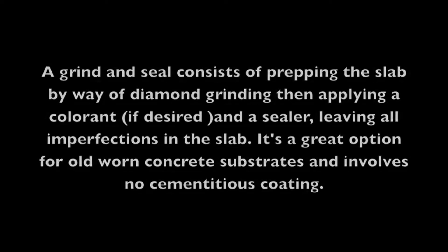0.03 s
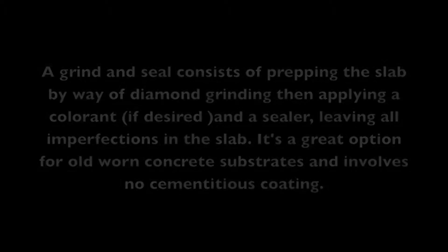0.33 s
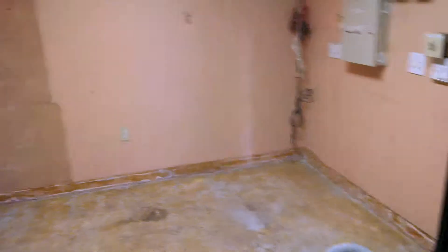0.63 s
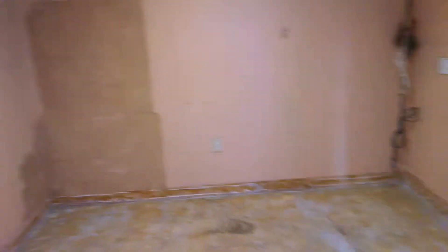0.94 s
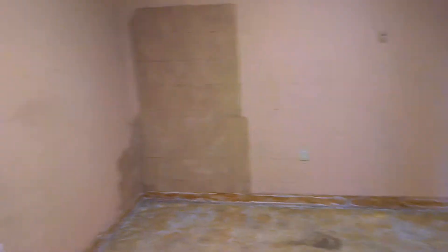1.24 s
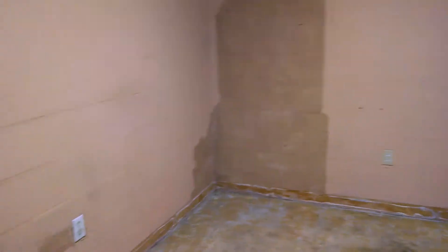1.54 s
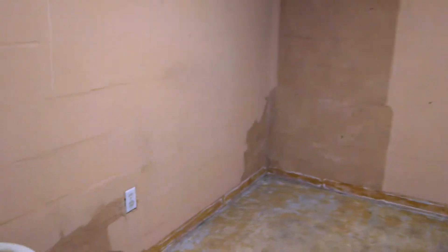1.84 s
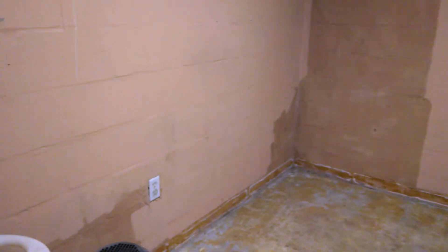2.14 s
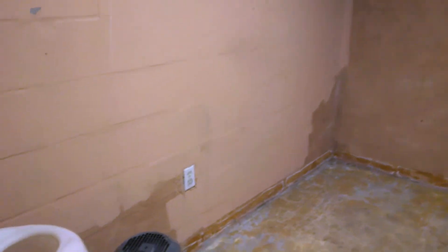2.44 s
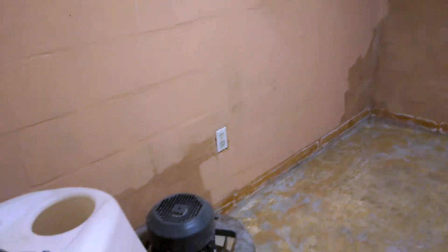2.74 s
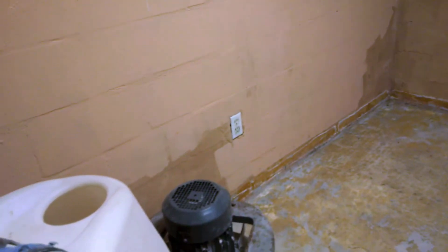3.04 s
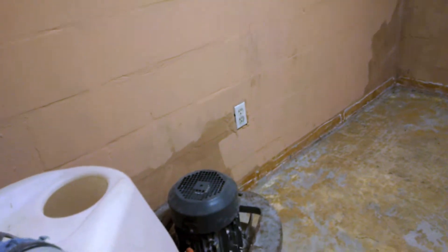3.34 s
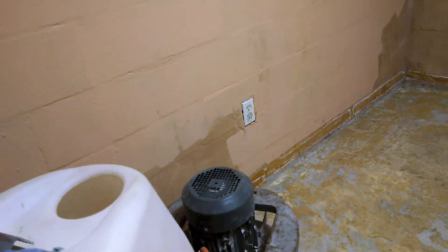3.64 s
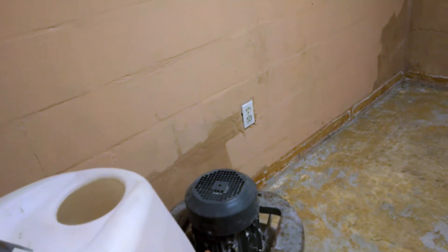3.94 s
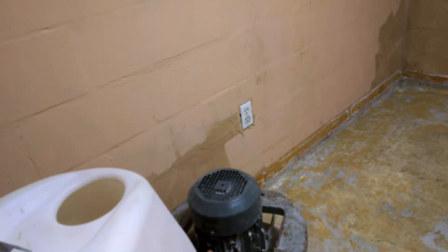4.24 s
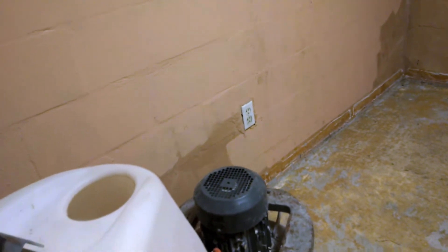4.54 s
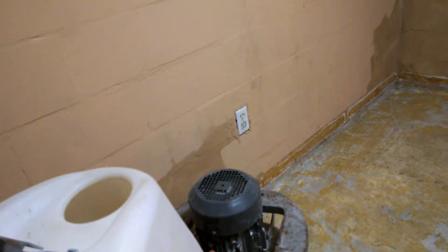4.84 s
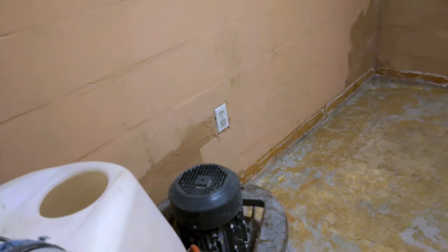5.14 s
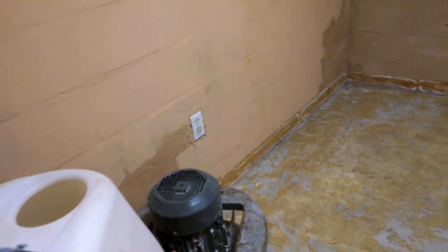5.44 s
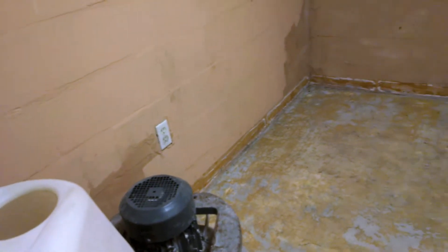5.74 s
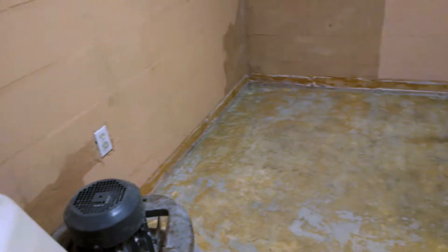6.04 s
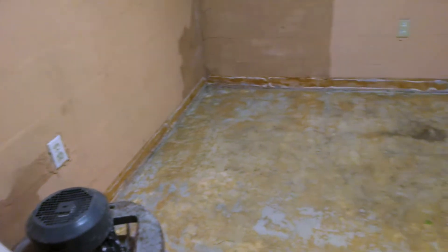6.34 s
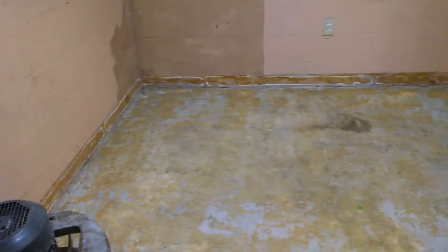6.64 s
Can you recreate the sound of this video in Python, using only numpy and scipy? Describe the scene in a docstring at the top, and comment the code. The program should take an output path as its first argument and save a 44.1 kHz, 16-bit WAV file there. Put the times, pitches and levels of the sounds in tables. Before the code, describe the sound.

A machine grinds a concrete floor steadily, hissing, rumbling and chattering, with one hard bump on the microphone early on.

```python
"""A hand-held camera cuts in at 0.7 s on a diamond floor grinder working concrete in a bare block room.
The frame rumbles, the motor hums and faintly whines, the steel disc rings, the head chatters, the
diamonds scratch out a dense hiss. The hiss swells once a turn, the chatter twice. From 1.2 s, now and
then, the diamonds rasp over a high spot or the head catches and growls. Bumps hit the camera at 1.7 and
2 s; the second, harder one ducks its gain, which creeps back for a second as it turns to the machine."""
import sys
import numpy as np
from scipy import signal
from scipy.fft import rfft, irfft, next_fast_len
from scipy.io import wavfile
from scipy.ndimage import uniform_filter1d, map_coordinates

SR = 44100
rng = np.random.default_rng(int(sys.argv[2]) if len(sys.argv) > 2 else 0)


def dump(signal):
    """Clip the signal to [-1, 1] and save it as 16-bit WAV at the path in sys.argv[1]."""
    limited = np.clip(np.atleast_2d(signal).T, -1, 1)
    pcm = np.round(limited * 32767).astype(np.int16)
    wavfile.write(sys.argv[1], SR, pcm)


N = 303849
TIME_S = np.arange(N) / SR
START_S, PORT_DELAY_S = 0.7125, 0.000392
TURN_HZ, HIGH_SIDE_S = 2.305, 3.83  # head rotation; one pass over the slab's high side

# stereo width at the microphone ports: (frequency [Hz], side over mid [dB])
SIDE_DB = [(50, -14), (150, -6.5), (400, -7), (800, -6.5), (1300, -0.5), (2000, 2.5), (3000, -0.5),
           (15000, 2)]
# share of the other port subtracted: (frequency [Hz], into left [ratio], into right [ratio])
CROSSFEED = [(300, 0.026, 0.016), (1200, 0.65, 0.71), (2330, 0.63, 0.67), (3780, 0.61, 0.49),
             (6200, .1, 0.37), (8940, 0.05, 0.28), (11700, 0.96, 1)]
# mains and motor tones: (frequency [Hz], level [dB], phase between ports [rad])
HUM_TONES = [(59.6, -55.5, .2), (115.4, -40, 1.5), (235.5, -39.5, 1.1)]
# hum drift: (time [s], gain [dB])
HUM_DRIFT_DB = [(0.71, 0), (1.9, 0.5), (2.4, -1.5), (3.8, -2), (5.3, -0.5), (6, 1.5), (6.88, .5)]
# motor whine: (frequency [Hz], width [Hz], relative level [dB])
WHINE_PEAKS = [(7885, 4, 0), (7961, 4, -8), (8039, 4, -8), (8115, 4, -2)]
# frame shake: (time [s], level [dB])
RUMBLE_DB = [(0.71, -29), (1.05, -30), (1.17, -22), (1.4, -27), (1.85, -23.5), (2.4, -26.2), (2.7, -24),
             (2.95, -26.3), (3.8, -28), (4.0, -26), (5.3, -26.5), (6.88, -28.8)]
# frame rumble: (frequency [Hz], relative density [dB])
RUMBLE_SPECTRUM = [(20, -25), (40, -19), (50, -11.5), (75, -29), (90, -24), (105, -12), (125, -12),
                   (145, -5.5), (220, -3), (250, -3.5), (290, 2), (400, -6.5), (700, -43)]
# room modes, camera facing the far corner: (frequency [Hz], width [Hz], level over rumble [dB])
CORNER_MODES = [(147, 6, 8.5), (185.5, 12, 7), (235, 10, 9.5), (295, 22, 7), (410, 30, 8.5)]
# room modes, camera facing the machine: (frequency [Hz], width [Hz], level over rumble [dB])
ROOM_MODES = [(138, 6, 6.5), (149.7, 3.8, 11.5), (173, 4.4, 1), (192, 5.5, 8.5), (209, 6, 6),
              (222.4, 7, 8.5), (235, 6, 10.5), (262, 5.5, 4.5), (284.7, 5.7, 6.5)]
# camera turn to the machine: (time [s], share of turn [ratio])
CAMERA_TURN = [(2, 0.025), (3.2, 1)]
# steel disc modes: (frequency [Hz], width [Hz], relative level [dB])
DISC_MODES = [(812, 9, -3), (831, 10, 6), (847, 12, 5.5), (881, 13, 2.5), (911, 10, 6), (1056, 20, -.5),
              (1108, 12, -5)]
# disc radiation band: (frequency [Hz], gain [dB])
DISC_BAND_DB = [(500, -25), (780, -1), (1100, 1), (1600, -25)]
# disc ring: (time [s], level [dB])
DISC_DB = [(0.71, -27), (1.2, -27.3), (1.9, -29), (2.7, -28), (3.5, -29), (3.95, -25), (4.4, -27),
           (5.2, -28), (6.2, -28), (6.5, -26.5), (6.88, -28.5)]
# disc pitch drift: (time [s], pitch [ratio])
DISC_PITCH = [(1.9, .98), (3.3, 1)]
# head and shroud modes: (frequency [Hz], width [Hz], level over spectrum [dB])
HEAD_MODES = [(338, 9, 4.5), (376, 11, 9), (394, 8, 3), (411, 12, 5.5), (458, 10, 5), (481, 10, 13),
              (549.5, 12, 10.5), (637, 18, 3.5)]
# head catches: (time [s], level [dB], length [s])
CATCHES = [(1.28, -17.5, 0.094), (1.4, -23.5, .06), (1.633, -18.5, 0.057), (1.796, -21, 0.1),
           (2.99, -16.8, .11), (3.25, -26, .08), (3.59, -23, .07), (4, -24, .1), (4.39, -14, 0.048),
           (4.6, -25.5, .1), (4.867, -19, 0.076), (4.94, -19, .06), (5.04, -19, .05), (5.23, -21, 0.054),
           (5.53, -22, .07), (5.76, -20.5, .06), (6.152, -13, .06), (6.35, -20, 0.076), (6.533, -20, .05),
           (6.79, -24, .06)]
# growl of a catch: (frequency [Hz], relative density [dB])
GROWL_SPECTRUM = [(150, -25), (330, -4), (420, 3), (480, 1.5), (510, -2.5), (560, 0), (700, -7.5),
                  (1200, -25)]
# head chatter: (time [s], level [dB])
CHATTER_DB = [(0.71, -26.5), (0.83, -23), (1.05, -24.5), (1.35, -23), (1.54, -24), (1.7, -21.3),
              (1.9, -20.5), (2.35, -21), (2.8, -21.6), (3.1, -21.5), (3.7, -22), (6.1, -22), (6.88, -22.5)]
# head chatter: (frequency [Hz], relative density [dB])
CHATTER_SPECTRUM = [(100, -50), (250, -15), (305, -8.5), (330, -1.5), (420, 0.5), (480, -3), (510, -4.5),
                    (590, 0.5), (720, -7), (900, -15), (2000, -45)]
# scrapes over high spots: (time [s], level [dB], length [s])
SCRAPES = [(1.177, -16, 0.14), (1.5, -20, .1), (1.74, -28, .1), (2.3, -21, .07), (2.64, -22, .08),
           (3.33, -21.5, .06), (3.577, -19, .05), (3.843, -20.5, .12), (4.028, -22, .06), (4.27, -21.5, .1),
           (4.38, -25, .06), (5.55, -25, .06), (6.034, -16.5, 0.096), (6.808, -19, .08)]
# rasp of a scrape: (frequency [Hz], relative density [dB])
RASP_SPECTRUM = [(300, -25), (800, -2.5), (1500, -5), (3000, -1), (4000, -1.5), (5000, -5.5), (9000, -10),
                 (15000, -19)]
# diamond bite: (time [s], level [dB])
HISS_DB = [(0.71, -17.5), (0.8, -13.9), (1.05, -13.5), (1.4, -13.6), (1.62, -13.5), (1.9, -14),
           (3.3, -13.5), (3.7, -15), (3.92, -13.5), (4.6, -14), (4.9, -14.5), (5.65, -13.5), (6.3, -14),
           (6.88, -13.4)]
# scratched concrete: (frequency [Hz], relative density [dB])
HISS_SPECTRUM = [(200, -43), (640, -4.5), (750, -5), (850, -4), (960, -7), (1100, -4.5), (1300, -6.5),
                 (1700, -4), (2100, -0.46), (2750, 1), (3100, -1.8), (3600, -5.6), (5500, -6.5),
                 (7500, -10), (9500, -12.5), (12000, -14.4), (15300, -21)]
# hiss midrange: (time [s], gain [dB])
HISS_MID_DB = [(0.71, 0), (1.8, 0), (2.2, 1.5), (3.5, 0.4), (4.5, 1), (5.6, -0.1), (6.88, -.7)]
# hiss treble: (time [s], gain [dB])
HISS_TREBLE_DB = [(0.71, -0.5), (1.15, 0.5), (1.4, -1), (1.9, -1.2), (2.5, -0.3), (3.3, 0), (6.88, 0)]
# camera bumps: (time [s], push peak [dB], rise [s])
BUMPS = [(1.6722, -11, .001), (1.975, 11.5, 0.00079)]


def amp(db):
    """Decibels to gain."""
    return 10 ** (np.asarray(db) / 20)


def unit(x):
    """x at rms 1."""
    return x / np.sqrt(np.mean(x ** 2) + 1e-20)


def along(rows, hz):
    """Table columns at hz, on a log frequency axis."""
    knots_hz, *columns = np.transpose(rows)
    return np.squeeze([np.interp(np.log(hz + 1), np.log(knots_hz + 1), c) for c in columns])


def curve(rows):
    """(time [s], value) rows, per sample."""
    return np.interp(TIME_S, *np.transpose(rows))


def wobble(rate_hz):
    """Smooth random curve, knots at rate_hz."""
    knots = rng.standard_normal(int(N * rate_hz / SR) + 4)
    return map_coordinates(knots, [TIME_S * rate_hz])


def turning(per_turn, lead_s=0):
    """Swing of +-1, per_turn cycles per head turn."""
    return np.cos(2 * np.pi * per_turn * TURN_HZ * (TIME_S - HIGH_SIDE_S + lead_s))


def swells(rows):
    """Sum of bell envelopes; length is the width at half height."""
    return sum(amp(db) * .5 ** ((2 * (TIME_S - at_s) / length_s) ** 2) for at_s, db, length_s in rows)


def warped(x, position):
    """x read at fractional samples; bends pitch."""
    return np.array([map_coordinates(port, [position], mode="mirror") for port in x])


def filtered(x, response):
    """x through a frequency response."""
    size = next_fast_len(N + SR // 2)
    return irfft(rfft(x, size) * response(np.fft.rfftfreq(size, 1 / SR)), size)[..., :N]


def band_level(x, gain_db, band):
    """x with one band following a gain table."""
    return x + (amp(curve(gain_db)) - 1) * filtered(x, band)


def peaks(modes, hz):
    """Power response of resonances."""
    return sum(amp(db) ** 2 / (1 + (2 * (hz - mode_hz) / width_hz) ** 2)
               for mode_hz, width_hz, db in modes)


def ringing(spectrum, modes):
    """Response of a broad spectrum with resonances on top."""
    return lambda hz: amp(along(spectrum, hz)) * np.sqrt(1 + peaks(modes, hz))


def microphone(field, colour):
    """Mid and side signals, coloured, through the widened stereo microphone; rms 1."""
    def response(hz):
        mid, side = np.ones_like(hz), amp(along(SIDE_DB, hz))
        left, right = np.array([mid, side]), np.array([mid, -side])
        into_left, into_right = along(CROSSFEED, hz) * np.exp(-2j * np.pi * hz * PORT_DELAY_S)
        mix = np.array([left - into_left * right, right - into_right * left])
        return colour(hz) * mix / np.sqrt(np.sum(np.abs(mix) ** 2, axis=(0, 1)))
    return unit(filtered(field, response).sum(axis=1))


def contacts(rate_hz, scatter_db, t60_s, room_db):
    """Tiny random impacts and their wash between bare walls."""
    counts = rng.poisson(rate_hz / SR, (2, N))
    signs = rng.choice([-1, 1], (2, N))
    sizes = amp(scatter_db * rng.standard_normal((2, N)))
    hits = unit(np.sqrt(counts) * signs * sizes)
    decay = amp(-60 * TIME_S[:SR] / t60_s) ** 2
    energy = np.abs(signal.fftconvolve(np.mean(hits ** 2, axis=0), decay)[:N])
    wash = unit(np.sqrt(energy) * rng.standard_normal((2, N)))
    return hits + amp(room_db) * wash


def motor(whine_db=-39.5):
    """Low tones wavering with load; a narrow, fluttering whine."""
    clock_s = np.cumsum(1 + 0.0029 * wobble(2.98) + 0.0028 * wobble(14)) / SR
    hum = np.zeros((2, N))
    for hz, db, phase_rad in HUM_TONES:
        tone = np.sin(2 * np.pi * hz * clock_s + np.array([[-.5], [.5]]) * phase_rad)
        hum += amp(db + 1.7 * wobble(13)) * np.sqrt(2) * tone
    whine = microphone(rng.standard_normal((2, N)), lambda hz: np.sqrt(peaks(WHINE_PEAKS, hz)))
    return amp(curve(HUM_DRIFT_DB)) * hum + amp(whine_db) * whine


def camera_bumps(highpass_hz=12):
    """Low pushes on the right port; widening feeds them left, inverted and late."""
    push = np.zeros((2, N))
    for at_s, db, rise_s in BUMPS:
        age = np.maximum(TIME_S - at_s - np.array([[PORT_DELAY_S], [0]]), 0) / rise_s
        push += amp(db) * age * np.exp(1 - age)
    # the input blocks steady pressure: slow back-swing
    return np.array([[1], [-1]]) * filtered(push, lambda hz: 1j * hz / (1j * hz + highpass_hz))


def frame_rumble():
    """The shaking frame stirs room modes; which stand out changes as the camera turns."""
    thuds = contacts(rate_hz=600, scatter_db=3.5, t60_s=.6, room_db=3.5)
    lurch_db = .4 * wobble(9)
    turned = curve(CAMERA_TURN)
    before = microphone(thuds, ringing(RUMBLE_SPECTRUM, CORNER_MODES))
    after = microphone(thuds, ringing(RUMBLE_SPECTRUM, ROOM_MODES))
    return amp(curve(RUMBLE_DB) + lurch_db) * ((1 - turned) * before + turned * after)


def disc_ring():
    """Scratching keeps the steel disc ringing; level and pitch drift."""
    drive = rng.standard_normal((2, N))
    ring = microphone(drive, lambda hz: np.sqrt(peaks(DISC_MODES, hz)) * amp(along(DISC_BAND_DB, hz)))
    return amp(curve(DISC_DB) + .8 * wobble(7)) * warped(ring, np.cumsum(curve(DISC_PITCH)))


def head_growl():
    """Each catch jolts the head, which booms in its own modes."""
    jolts = contacts(rate_hz=900, scatter_db=2, t60_s=.4, room_db=2)
    return swells(CATCHES) * microphone(jolts, ringing(GROWL_SPECTRUM, HEAD_MODES))


def head_chatter(swing_db=0.5, waver_s=0.0003):
    """Segments knock over the uneven slab and ring the head; the load throbs twice a turn."""
    knocks = contacts(rate_hz=1000, scatter_db=2.5, t60_s=0.62, room_db=1.5)
    throb_db = swing_db * turning(2, lead_s=0.043) + 0.43 * wobble(24)
    ring = microphone(knocks, ringing(CHATTER_SPECTRUM, HEAD_MODES))
    position = np.arange(N) + waver_s * SR * wobble(9)  # load bends the modes
    return amp(curve(CHATTER_DB) + throb_db) * warped(ring, position)


def diamond_scrapes():
    """Diamonds dig into high spots: brief, coarse rasps."""
    chips = contacts(rate_hz=2500, scatter_db=2, t60_s=.2, room_db=3)
    return swells(SCRAPES) * microphone(chips, lambda hz: amp(along(RASP_SPECTRUM, hz)))


def diamond_hiss(swing_db=0.68, ripple_hz=30, ripple_db=1.5, mid_hz=1500, treble_hz=5000):
    """Diamonds chip the concrete, harder once a turn; a fine, fixed random ripple colours the hiss."""
    chips = contacts(rate_hz=5000, scatter_db=2.5, t60_s=0.22, room_db=3.5)
    surge_db = swing_db * turning(1) + 0.29 * wobble(45)
    knots_hz = np.arange(0, SR / 2, ripple_hz)
    ripple_gain_db = ripple_db * rng.standard_normal(len(knots_hz))
    hiss = microphone(
        chips, lambda hz: amp(along(HISS_SPECTRUM, hz) + np.interp(hz, knots_hz, ripple_gain_db)))
    hiss = band_level(hiss, HISS_MID_DB, lambda hz: np.exp(-(2 * np.log((hz + 1) / mid_hz)) ** 2))
    hiss = band_level(hiss, HISS_TREBLE_DB, lambda hz: hz ** 4 / (hz ** 4 + treble_hz ** 4))
    return amp(curve(HISS_DB) + surge_db) * hiss


def scene():
    """Grinder plus camera bumps."""
    return (frame_rumble() + head_chatter() + head_growl() + diamond_hiss() + diamond_scrapes()
            + disc_ring() + motor() + camera_bumps())


def gain_control(x, ceiling_db, recovery_db_per_s):
    """A 1 ms mean over the ceiling cuts the gain at once; it climbs back steadily."""
    level = np.abs(uniform_filter1d(np.abs(x).max(axis=0), size=44))
    over_db = np.maximum(20 * np.log10(level + 1e-9) - ceiling_db, 0)
    climb_db = recovery_db_per_s * TIME_S
    return x * amp(climb_db - np.maximum.accumulate(over_db + climb_db))


def record(dry, top_hz=15100, edge_hz=60):
    """Camera: cut-in, gain control, full-scale clip, band limit."""
    ducked = gain_control(dry * (TIME_S >= START_S), ceiling_db=-0.2, recovery_db_per_s=10)
    return filtered(np.clip(ducked, -1, 1), lambda hz: .5 - .5 * np.tanh((hz - top_hz) / edge_hz))


dry = scene()
out = record(dry)
dump(out)
```